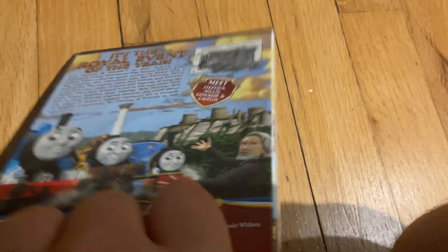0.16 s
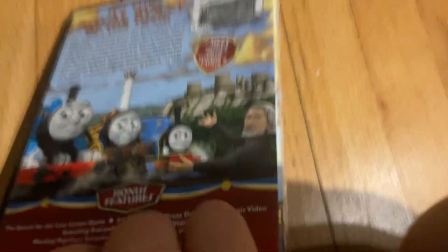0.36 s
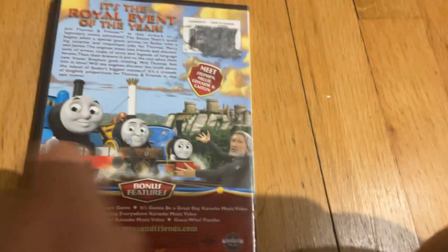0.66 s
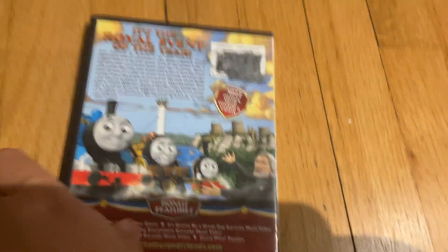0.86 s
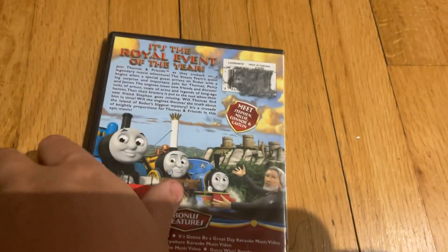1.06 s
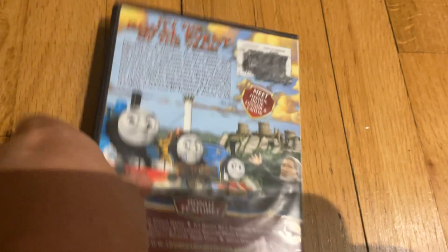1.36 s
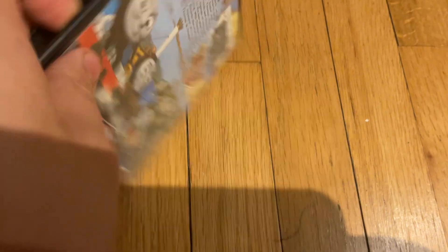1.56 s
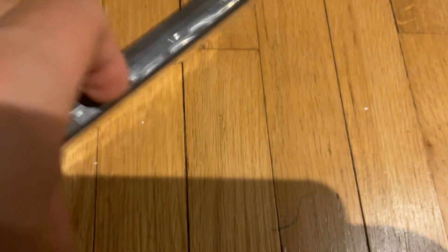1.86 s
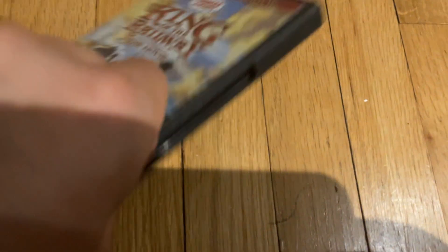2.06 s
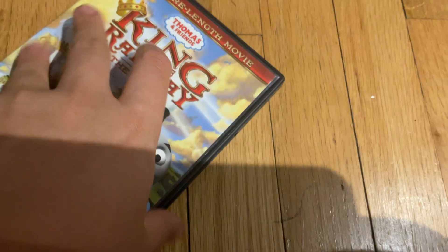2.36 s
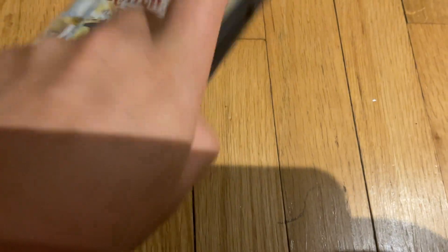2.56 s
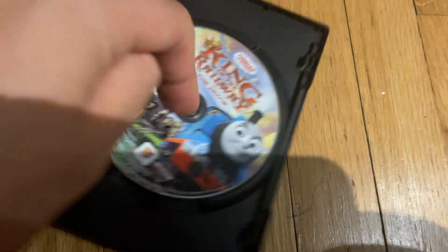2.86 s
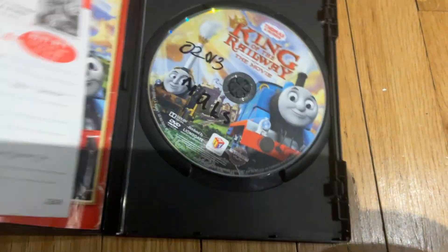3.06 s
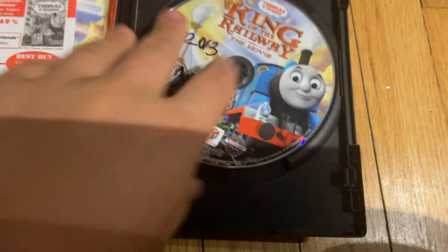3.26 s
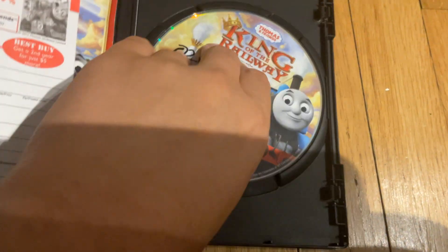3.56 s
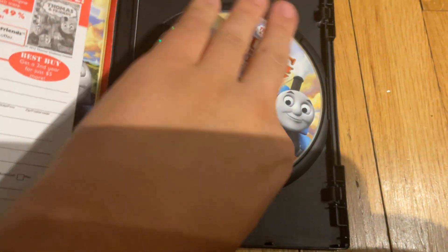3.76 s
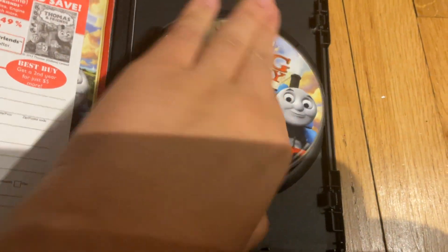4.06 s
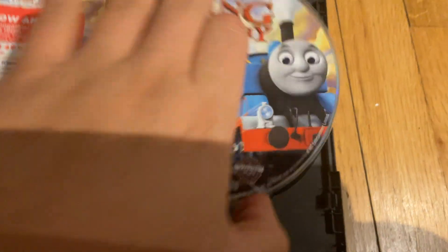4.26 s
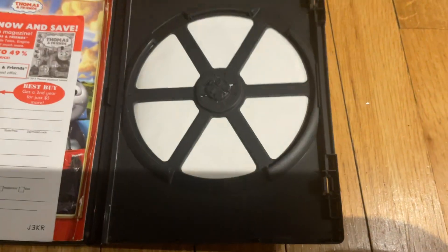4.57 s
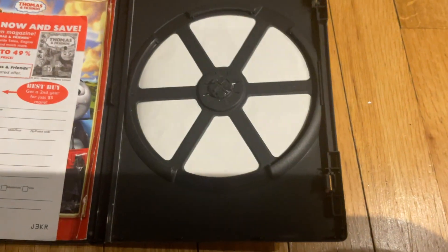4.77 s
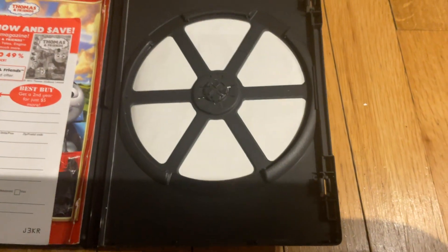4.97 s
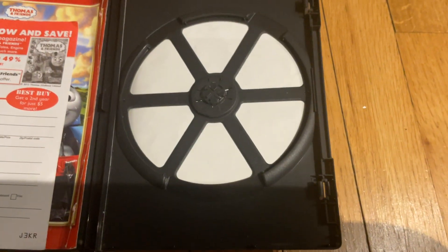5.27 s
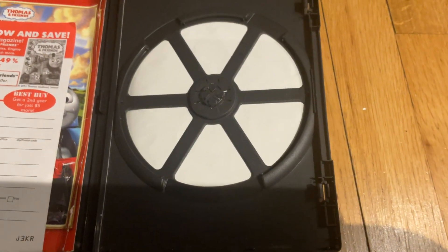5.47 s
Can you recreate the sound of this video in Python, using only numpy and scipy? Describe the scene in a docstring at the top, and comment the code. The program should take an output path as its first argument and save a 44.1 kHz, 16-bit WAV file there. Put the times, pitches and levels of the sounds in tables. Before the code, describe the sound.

A light plastic disc case is handled on a wood floor: loud hollow knocks first, scuffing and rustling fingers, a pause with faint taps, more turning and bumping, a short rough skid, and sharp opening snaps. Small dry clicks lead to a bright pop of the released disc. The rest is nearly still, with low room tone and a far appliance hum, heard close by a phone indoors.

```python
"""A hollow plastic disc case is dropped on a wooden floor, turned over, slid and snapped open, and its disc
popped out. Contacts and their first strong wall returns are played as damped modes of shell, lid, rim and
boards with a room tail. Grainy noise makes the scrapes, the skid and soft rustles and hisses: fingers on the
sleeve, later on the disc. Soft dry taps disperse as falling chirps; the freed disc is a thin bright noise burst
with its own room tail. Wavering sines are an appliance humming far away, over steady room tone; a phone close
by picks it all up."""
import sys
import numpy as np
from scipy import signal
from scipy.fft import rfft, irfft, next_fast_len
from scipy.io import wavfile
from scipy.ndimage import map_coordinates

SR = 44100
rng = np.random.default_rng(int(sys.argv[2]) if len(sys.argv) > 2 else 0)


def master(y):
    """Save y as 16-bit WAV."""
    cut = np.clip(np.atleast_2d(y).T, -1, 1)
    pcm = np.round(cut * 32767)  # scale
    wavfile.write(sys.argv[1], SR, pcm.astype(np.int16))


N = 248106  # length in samples


def amp(db):
    """Decibel law: amplitude gain of a level in dB."""
    return 10 ** (np.asarray(db) / 20)


def unit(x):
    """Power normalisation: x at rms 1."""
    return x / np.sqrt(np.mean(x ** 2) + 1e-20)


def along(points, hz):
    """Logarithmic frequency scale: values interpolated between (f/Hz, value) points."""
    f, value = np.transpose(points)
    return np.interp(np.log(hz + 1), np.log(f + 1), value)


def wobble(rate):
    """Slow random modulation: a smooth curve through rate random knots a second."""
    knots = rng.standard_normal(int(N * rate / SR) + 4)
    return map_coordinates(knots, [np.arange(N) * rate / SR])


def filtered(x, response):
    """Linear filtering: the spectrum of x times a response of frequency."""
    m = next_fast_len(N + 8192)
    return irfft(rfft(x, m) * response(np.fft.rfftfreq(m, 1 / SR)), m)[..., :N]


def noise(spectrum, grain_db):
    """Random excitation: coloured noise of rms 1, lumped into stick-slip grains of limited size."""
    lumps = 1.46 * np.clip(wobble(350), -2, 2) + 0.6 * wobble(45)
    slips = amp(grain_db * lumps) * rng.standard_normal(N)
    return unit(filtered(slips, lambda hz: amp(along(spectrum, hz))))


# lines of the far appliance: (f/Hz, level/dB before the common trim)
HUM_LINES = [(118.4, -71.5), (172.3, -72.5), (231.5, -75), (333.8, -71), (500.6, -89), (667.5, -88),
             (1028, -89)]
# room tone spectrum: (f/Hz, relative level/dB per Hz)
ROOM_TONE = [(15, -51.5), (25, 9.5), (141, -4), (451, -14), (607, -24), (1100, -22.5), (1330, -33),
             (1440, -26), (1740, -29.5), (2160, -34), (3620, -33), (6380, -40.5), (11600, -40.5),
             (14400, -33), (16000, -33.5)]


def background():
    """Tonal and broadband ambience: a motor's wavering lines over steady room tone (a grain of 0 dB is even)."""
    t = np.arange(N) / SR
    hum = np.zeros(N)
    for hz, db in HUM_LINES:
        level = amp(db + 5.5 + 2.3 * wobble(29.0))
        hum += level * np.sin(2 * np.pi * hz * t + 0.79 * wobble(10))
    return hum + amp(-55.5 + 0.33 * wobble(4.3)) * noise(ROOM_TONE, grain_db=0.0)


def strokes(rows, first, second, judder_db):
    """Amplitude modulation: each stroke swells, peaks and fades; one unsteady envelope plays both layers."""
    t, gains = np.arange(N) / SR, np.zeros((2, N))
    fade_db = 13.5  # drop one rise before and one fall after the strongest moment
    for s, rise_s, fall_s, db, second_db in rows:
        away = (t - s) / np.where(t < s, rise_s, fall_s)
        gains += amp(db - fade_db * away ** 2) * amp([[0], [second_db]])
    return amp(judder_db * wobble(22)) * (gains[0] * first + gains[1] * second)


# shell scraping the boards: (strongest at t/s, rise t/s, fall t/s, shell level/dB, edges level/dB re shell)
SCRAPE_STROKES = [(.02, 0.033, 0.12, -51.5, -6), (.26, 0.19, 0.2, -56, -4.5), (.54, 0.068, 0.09, -53.5, 1),
                  (.78, 0.14, 0.21, -62, 3.5), (.97, 0.07, 0.075, -70.5, 0),
                  (1.24, 0.033, 0.055, -57.5, -27), (1.35, 0.065, 0.058, -54, -8),
                  (1.48, 0.074, 0.095, -44.5, -4), (1.69, 0.066, 0.11, -48.5, -12),
                  (1.8, 0.063, 0.11, -64, -5), (1.91, 0.035, 0.027, -51.5, -4.5),
                  (1.995, 0.054, 0.019, -44, -12), (2.445, 0.061, 0.053, -46, -14),
                  (2.51, 0.051, 0.058, -43.5, -9), (2.58, 0.048, .05, -43.5, -7.5),
                  (2.626, 0.036, 0.045, -64.5, 2), (2.72, 0.048, 0.21, -47.5, -11),
                  (2.96, .04, .06, -47, -7), (3.05, 0.031, 0.097, -62, 2), (3.67, 0.044, 0.11, -67, 6),
                  (4.06, 0.059, 0.035, -74, 3.5), (5.22, 0.046, .14, -68.5, -1.5),
                  (5.52, 0.026, .02, -65, -6.5)]
# soft rustles and hisses: fingers on the sleeve, later a short tick and faint swishes of fingers on the disc: #
# (strongest at t/s, rise t/s, fall t/s, rustle level/dB, hiss level/dB re rustle)
RUSTLE_STROKES = [(.03, 0.034, 0.09, -61, 2), (.32, 0.1, 0.08, -59.5, 0.5), (.8, 0.22, 0.14, -58.5, -2.5),
                  (1.0, 0.11, 0.074, -70.5, -4.5), (1.5, 0.07, 0.091, -65, -13),
                  (1.68, 0.18, 0.11, -58.5, 13.5), (2.0, 0.045, 0.034, -68, 4.5),
                  (2.52, 0.093, 0.11, -62, 1.5), (2.72, .03, 0.034, -66, -2.5),
                  (2.99, 0.074, 0.12, -61.5, 3.5), (3.565, 0.011, 0.031, -75, 16),
                  (3.68, 0.069, .14, -68, -15.5), (3.83, 0.076, 0.12, -73, 10.5),
                  (4.01, 0.043, 0.082, -66.5, 2.5), (4.2, 0.062, 0.14, -68, 4),
                  (5.2, 0.036, 0.069, -70.5, -1.5), (5.31, 0.022, .03, -79.5, 9.5)]
# spine skidding over the boards: (strongest at t/s, rise t/s, fall t/s, shell level/dB, grit level/dB re shell)
SKID_STROKES = [(2.14, 0.13, .04, -40, 0.5)]
# spectra of shell drag, edges, rustle, hiss and grit: (f/Hz, relative level/dB per Hz)
SHELL_DRAG = [(120, -37.5), (200, -7), (350, -7.5), (520, -4.5), (660, -1.5), (790, -16.5), (1100, -25),
              (1600, -46)]
EDGE_SCRAPE = [(600, -29), (900, 5), (1450, 1.5), (2500, -4), (3500, -10), (5000, -40.5)]
SOFT_RUSTLE = [(2200, -36), (3800, 6), (5500, 0), (8500, -5), (10500, -16.5), (13000, -30)]
SOFT_HISS = [(6000, -29), (9000, -7), (11500, -2.5), (14000, 0), (16500, 1)]
BOARD_GRIT = [(700, -28.5), (1500, -3.5), (2400, -6), (3600, -3), (7500, -7), (11000, -4.5), (14000, -14),
              (16000, -12.5)]


def handling():
    """Friction and soft noise: the shell scrapes and skids over the boards, amid soft rustles and hisses."""
    scrape = strokes(SCRAPE_STROKES, noise(SHELL_DRAG, grain_db=4.5), noise(EDGE_SCRAPE, grain_db=2.0), judder_db=1.5)
    rustle = strokes(RUSTLE_STROKES, noise(SOFT_RUSTLE, grain_db=2.0), noise(SOFT_HISS, grain_db=1.2), judder_db=0.8)

    def floor_echo(hz):
        """Comb interference: the direct sound plus a weaker floor echo 1/1870 s later."""
        return 1 + 0.32 * np.exp(-2j * np.pi * hz / 1870)

    grit = unit(filtered(noise(BOARD_GRIT, grain_db=1.35), floor_echo))
    skid = strokes(SKID_STROKES, noise(SHELL_DRAG, grain_db=-0.5), grit, judder_db=0.8)
    return scrape + rustle + skid


def ring(modes, t, attack, scatter_db):
    """Modal synthesis: damped sines with scattered strengths and pitches, peak 1."""
    hz, db, t60 = np.transpose(modes)[:, :, None]
    level_chance, pitch_chance = rng.standard_normal((2, len(modes), 1))
    decay = amp(db + scatter_db * level_chance - 60 * t / t60)
    waves = decay * np.sin(2 * np.pi * hz * (1 + 0.042 * pitch_chance) * t)
    wave = waves.sum(axis=0) * (1 - np.exp(-t / attack))
    return wave / np.abs(wave).max()


def burst(t, lo_hz, hi_hz, t60):
    """High modal density: modes too close to tell apart become decaying band noise, peak 1."""
    band = signal.butter(2, [lo_hz, hi_hz], "band", fs=SR, output="sos")
    puff = signal.sosfilt(band, rng.standard_normal(len(t)) * amp(-60 * t / t60))
    return puff / np.abs(puff).max()


# reverberation time of the room: (f/Hz, t60/s)
ROOM_DECAY = [(100, 1), (300, 0.17), (700, 0.24), (2000, 0.28), (5000, 0.3), (13000, .23)]


def room_tail(colour, gap):
    """Diffuse reverberation: coloured noise swells over the path to the walls, each frequency dying at its own rate."""
    hz, t, z = signal.stft(rng.standard_normal(SR // 2), SR, nperseg=256)
    level_db = along(colour, hz)[:, None] - 60 * t / along(ROOM_DECAY, hz)[:, None]
    tail = signal.istft(z * amp(level_db), SR, nperseg=256)[1]
    return tail * (1 - np.exp(-(np.arange(len(tail)) / SR / gap) ** 2))


def bending(x, spread):
    """Dispersion of bending waves: group delay is spread / sqrt(f), counted from that at 1600 Hz; low tones lag."""
    return filtered(x, lambda hz: np.exp(-2j * np.pi * spread * (2 * np.sqrt(hz) - hz / 40)))


# contacts and the first strong returns from the walls some 13 ms after them:
# (t/s, shell level/dB, most excited panel f/Hz, board thud level/dB, board f/Hz,
# nearness to the rim as level/dB, hardness as level/dB); the last levels re shell, all before fixed trims
CONTACTS_AND_RETURNS = [(0.058, -9, 570, -9.5, 285, -5, -13.5), (0.062, -16.5, 600, -1, 192, -13.5, -20),
                        (0.235, -40.5, 509, -6, 209, -6, -19), (0.269, -43, 714, -1, 228, -15.5, -12),
                        (0.43, -49.5, 716, 3.5, 222, -5, -3.5), (0.565, -12, 630, -15.5, 223, -7, -14),
                        (0.581, -5.5, 690, -19, 208, -11.5, -19),
                        (0.594, -16.5, 605, -10.5, 181.4, -5, -9.5),
                        (1.421, -28.5, 630, -11.5, 220, -13.5, -56), (1.471, -30, 690, -21, 278, -16, -33),
                        (1.641, -24.5, 527, 1, 202, -14, -17.5), (1.734, -14, 537, -5.5, 209, -14.5, -23.5),
                        (1.921, -42, 740, -9, 208, -9, -0.5), (1.941, -33.5, 616, -12, 150, -19, 0.5),
                        (1.949, -31, 659, -3, 219, -11, -24), (1.965, -33.5, 528, -1, 204, -18, -30),
                        (2.034, -38, 611, -18.5, 229, -7, 0.5), (2.168, -9, 735, -16.5, 165, -7, -17),
                        (2.182, -21.5, 800, -10, 165, -7.5, 2), (2.442, -46, 719, -7, 166, -17, -28),
                        (2.59, -34, 597, -27, 222, -27, -12.5), (2.629, -38.5, 668, -17, 217, -18, -33.5),
                        (2.683, -39.5, 622, -12.5, 104, -5, -16.5), (2.692, -36, 641, -23, 196, -13, -16.5),
                        (2.788, -21, 660, -13.5, 217, 3, -11), (2.794, -11, 493, -18, 247, -8.5, -15),
                        (2.811, -18.5, 604, -13.5, 85, -9, -4.5), (2.877, -30.5, 598, 4.5, 186.5, 8.5, 3),
                        (3.015, -30, 590, -15, 271, -25, -30), (3.02, -43, 725, 2.5, 172, -7, -10),
                        (3.201, -51, 550, -6, 104.7, 1, -52), (3.377, -52, 880, -7, 228, -4, -5.5),
                        (3.39, -43, 590, -12.5, 128, 1.5, -6), (3.415, -51.5, 533, -2, 160, 10.5, -8),
                        (3.437, -32, 557, -10.5, 294, 6, 3), (3.44, -30, 870, -12, 260, 4.5, 0),
                        (3.462, -41, 595, -7, 250, 10.5, -10), (3.613, -55.5, 560, 5.5, 185, 3.5, -17),
                        (3.889, -28.5, 735, -9, 256, 4, -4), (3.895, -19.5, 705, -6, 205, -5, -5.5),
                        (4.063, -60, 574, -9, 177, 11.5, -11), (4.103, -48, 877, 2.5, 274, 12.5, -3),
                        (4.117, -40, 507, -9, 213, 2.5, -4.5), (5.529, -35, 437, -2.5, 260, -6.5, -22),
                        (5.54, -26.5, 885, -9, 117.5, -3, -1.5)]
# flat panels of the shell: (f/Hz, level/dB, t60/s)
SHELL_MODES = [(437, -2.5, 0.052), (518, -5.5, 0.04), (604, 3.5, 0.025), (667, -1, .045),
               (920, -7.5, 0.057)]
# lid and hub: (f/Hz, level/dB, t60/s)
LID_MODES = [(1055, 3, 0.022), (1194, 4, 0.025), (1230, -6.5, 0.046)]
# floor under the case: (multiple of the board f, level/dB, t60 in periods of the board f)
BOARD_MODES = [(.8, -10, 11), (1, 4, 12.1), (1.248, -6, 11)]
# stiff edges: (f/Hz, level/dB, t60/s)
RIM_MODES = [(1676, 0.5, 0.011), (1890, -3, 0.013), (2570, -5, .01), (3070, -11.5, 0.013)]


def contacts_and_returns():
    """Impact excitation: crack, shell, lid, rim, boards and room tail; a strong wall return repeats the same build."""
    body, air, t = np.zeros(N + SR), np.zeros(N + SR), np.arange(SR // 5) / SR
    for s, db, panel_hz, thud_db, board_hz, rim_db, crack_db in CONTACTS_AND_RETURNS:
        lid_db = -2.5 + 0.7 * rim_db  # the lid rings more nearer the rim
        top_db = -1.5 + 0.97 * crack_db  # a harder sound reaches higher
        boards = [(k * board_hz, level, cycles / board_hz) for k, level, cycles in BOARD_MODES]
        # the panels near one pitch are favoured, by 14 dB an octave
        shell = [(hz, level - 14 * abs(np.log2(hz / panel_hz)), t60) for hz, level, t60 in SHELL_MODES]
        low = ring(shell, t, 0.0003, scatter_db=6.0)
        low += amp(lid_db) * ring(LID_MODES, t, 0.0011, scatter_db=2.5)
        low += amp(thud_db + 3.5) * ring(boards, t, 0.0027, scatter_db=6.5)
        high = amp(rim_db - 1.0) * ring(RIM_MODES, t, 0.0016, scatter_db=7)
        high += amp(rim_db) * burst(t, 1400, 4400, 0.026)
        high += amp(crack_db + 3.0) * burst(t, 5000, 11000, 0.016)
        high += amp(top_db - 2.5) * burst(t, 13000, 14000, 0.028)
        # the room tail smears the sound to a smooth spectrum: (f/Hz, level/dB)
        colour = [(board_hz / 3, thud_db - 14), (board_hz, thud_db + 0.5), (370, -5), (panel_hz, 3),
                  (1200, lid_db + 3.0), (2800, rim_db - 0.5), (7500, crack_db - 1.5), (14000, top_db - 3.5)]
        airborne = amp(-5.5) * room_tail(colour, gap=0.002)
        airborne[:len(t)] += high
        start = round(s * SR)
        body[start:][:len(t)] += amp(db + 2) * low
        air[start:][:len(airborne)] += amp(db + 1.5) * airborne
    return air[:N] + bending(body[:N], spread=0.0685)


# soft dry taps, most as the case rocks on the boards, the last a lone knock:
# (t/s, tap level/dB before a fixed gain, tick level/dB re tap level)
DRY_TAPS = [(0.747, -35, -17), (0.851, -30, -24), (0.875, -36.5, -22), (0.888, -41, -18),
            (0.918, -39, -17.5), (0.95, -37.5, -17.5), (2.412, -39.5, -14), (4.562, -40.5, -13.5)]
# tap spectrum: (f/Hz, relative level/dB)
TAP_SPECTRUM = [(100, -27.5), (250, 0), (350, -1.5), (700, -13.5), (1500, -24), (2600, -50), (4000, -50)]


def soft_taps():
    """Dispersed impulses: each soft dry tap is a bright tick and a short falling chirp, without a room tail."""
    taps, ticks, t = np.zeros(N), np.zeros(N + SR), np.arange(SR // 20) / SR
    for s, db, tick_db in DRY_TAPS:
        start = round(s * SR)
        taps[start] = amp(db + 35.5)
        ticks[start:][:len(t)] += amp(db + tick_db) * burst(t, 2520, 3200, 0.023)
    thuds = filtered(taps, lambda hz: amp(along(TAP_SPECTRUM, hz)))
    return ticks[:N] + bending(thuds, spread=0.16)


# the disc springs off the hub: (t/s, direct peak level/dB, room answer level/dB re direct)
DISC_POP = (3.892, -19, -7)


def pop():
    """Sudden release: the freed disc rings thin and bright near the top of the band, and the walls return it."""
    s, db, wet_db = DISC_POP
    t, out = np.arange(SR // 5) / SR, np.zeros(N + SR)
    sound = amp(wet_db) * room_tail([(8000, -21), (12500, 2.0), (15500, 3.0)], gap=0.0017)
    sound[:len(t)] += burst(t, 13200, 13400, 0.027)
    out[round(s * SR):][:len(sound)] = amp(db) * sound
    return out[:N]


def scene():
    """Superposition: the pressures of all sources add at one microphone."""
    return (background() + handling() + contacts_and_returns() + soft_taps() + pop())[None]


def record(dry):
    """Band limiting: the phone thins the deep bass and keeps nothing above its upper edge."""
    top_hz, slope_hz, bass_hz = 15800, 150, 42

    def response(hz):
        """Eight first-order high-passes in cascade, and a straight slope to silence at the top."""
        edge = np.clip((top_hz + slope_hz - hz) / slope_hz, 0, 1)
        return edge * (1j * hz / (bass_hz + 1j * hz)) ** 8

    return filtered(dry, response)


dry = scene()
out = record(dry)
master(out)
```